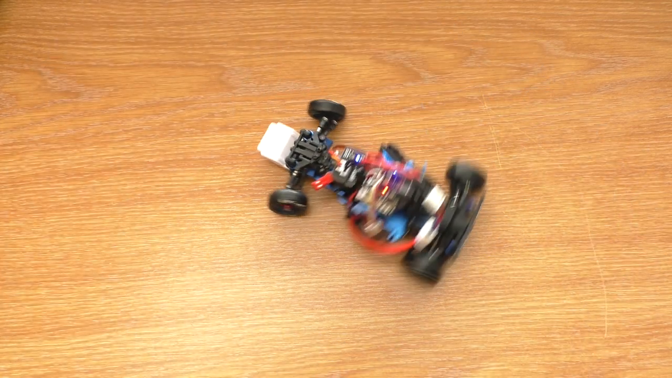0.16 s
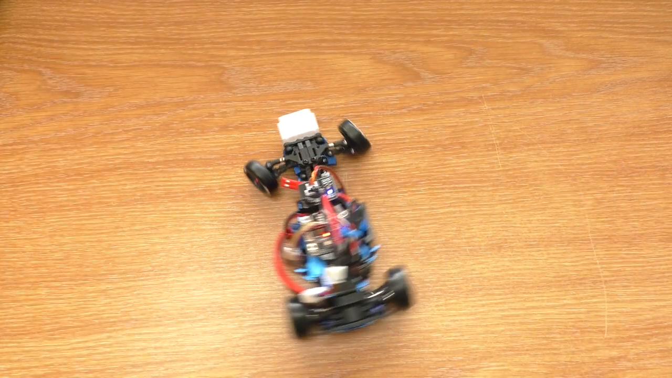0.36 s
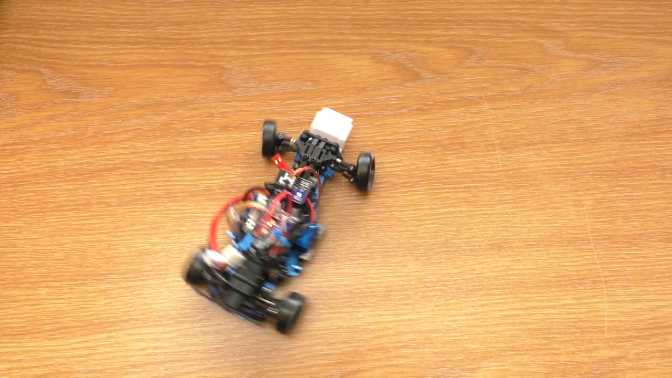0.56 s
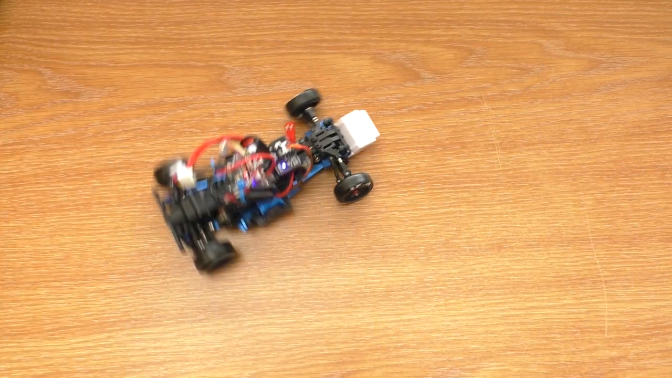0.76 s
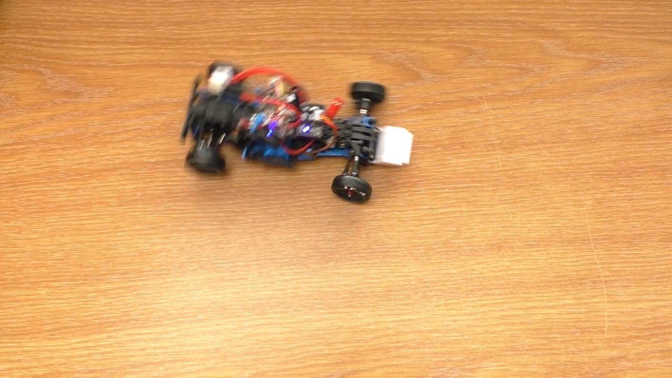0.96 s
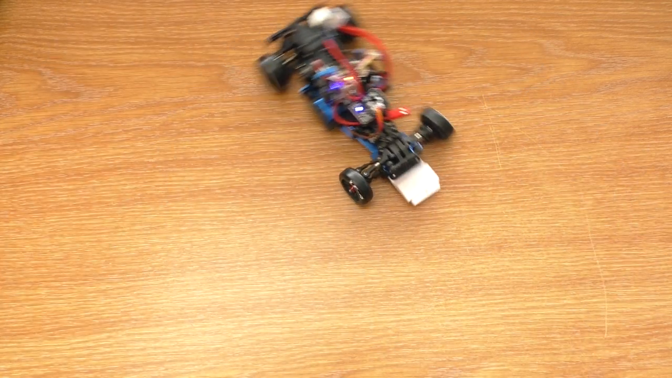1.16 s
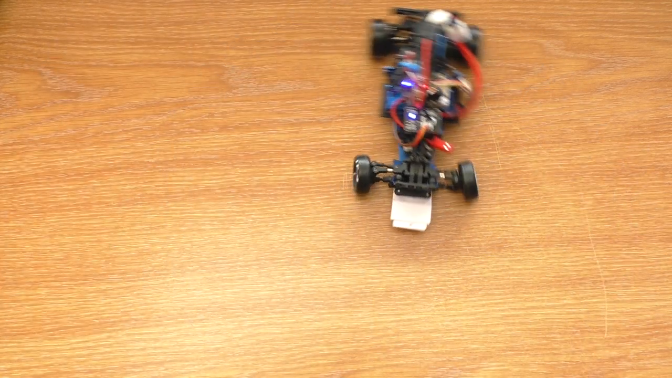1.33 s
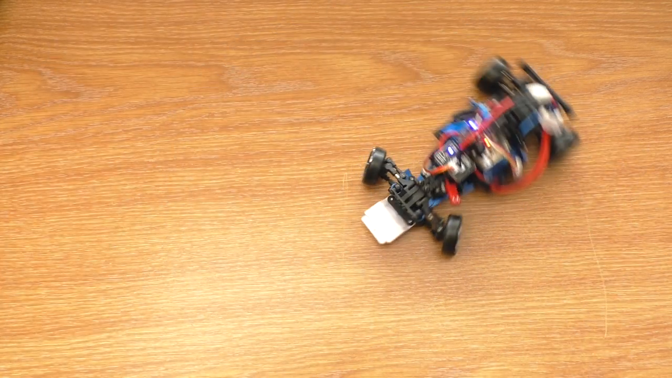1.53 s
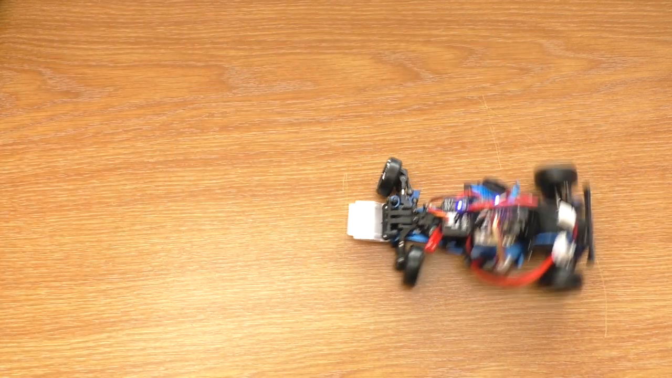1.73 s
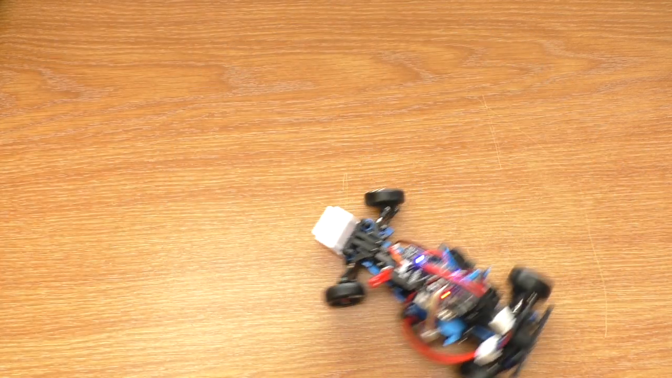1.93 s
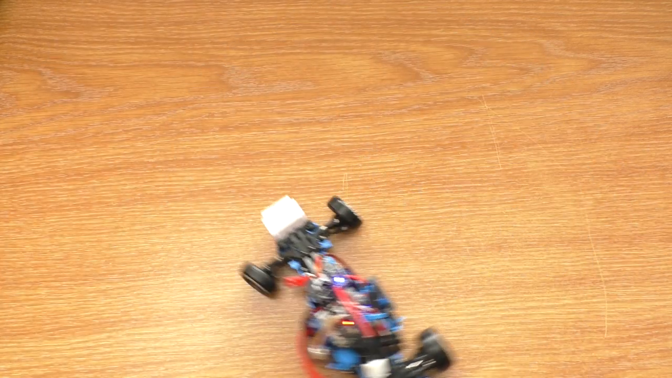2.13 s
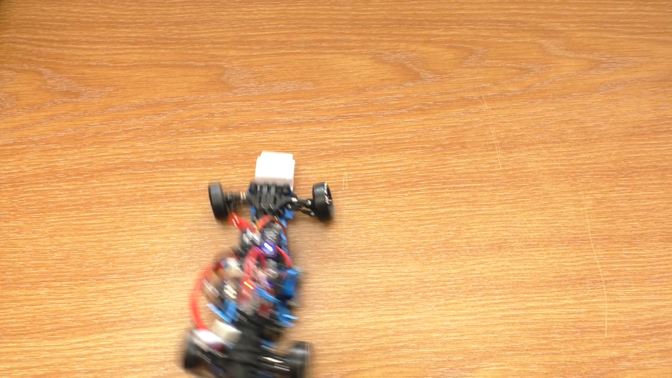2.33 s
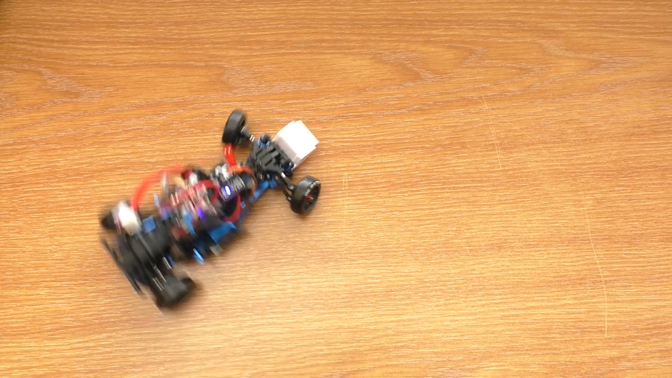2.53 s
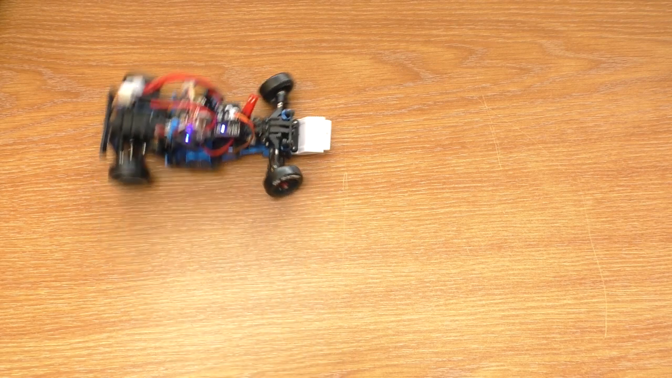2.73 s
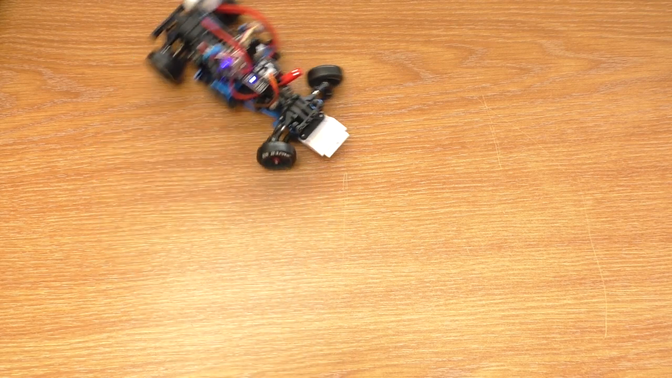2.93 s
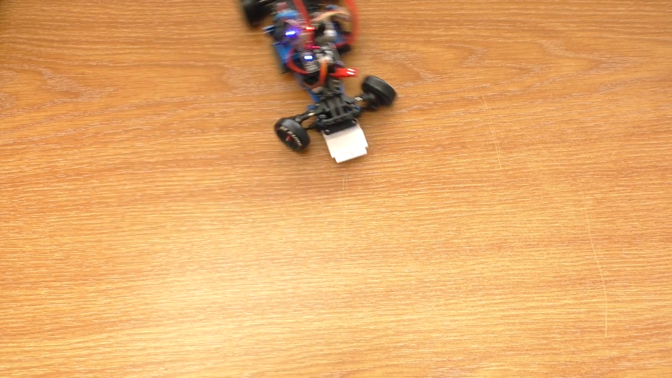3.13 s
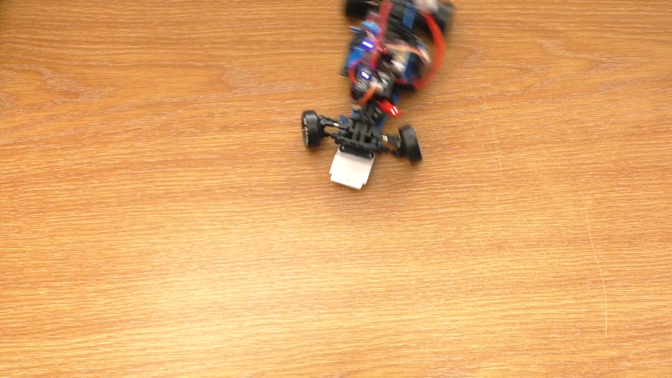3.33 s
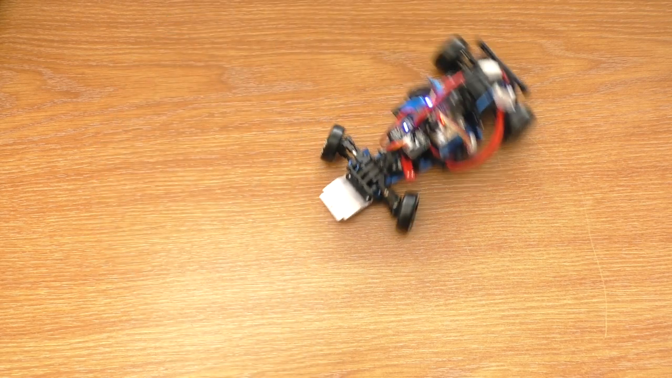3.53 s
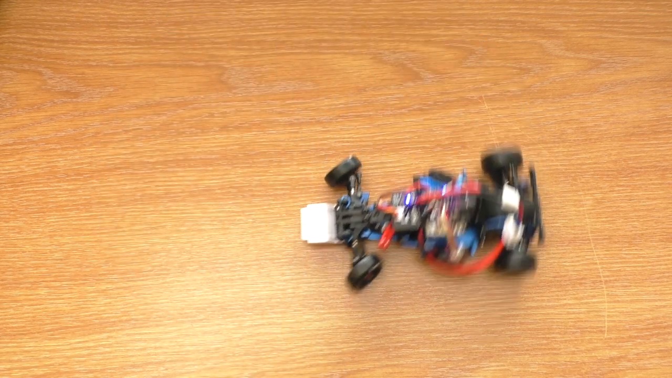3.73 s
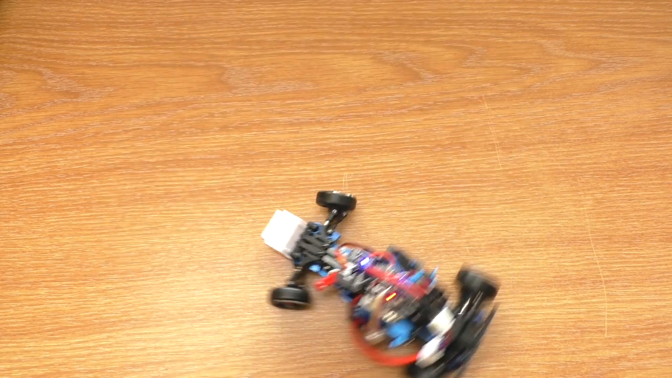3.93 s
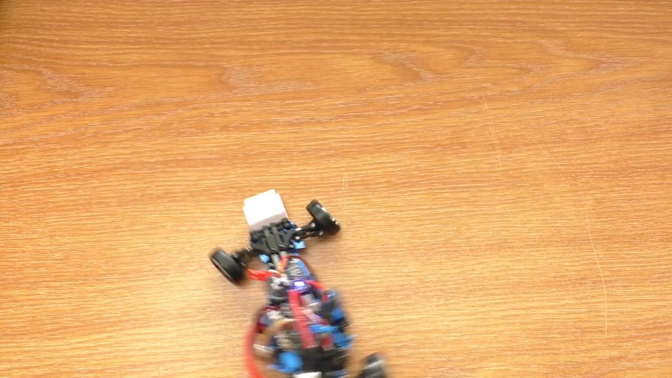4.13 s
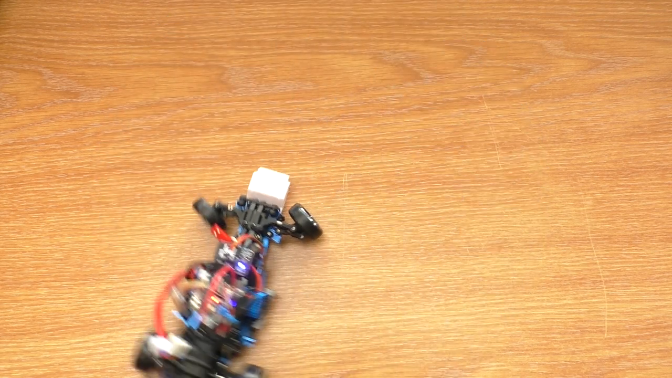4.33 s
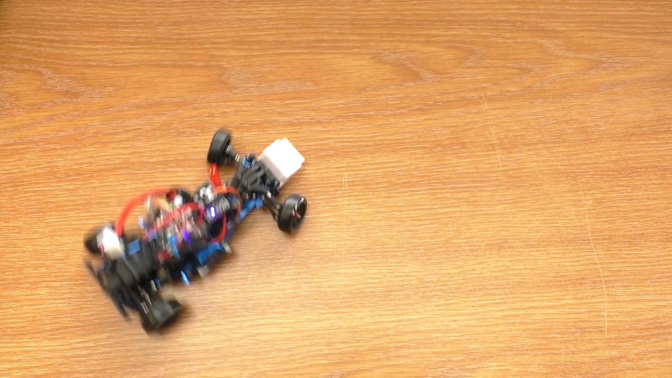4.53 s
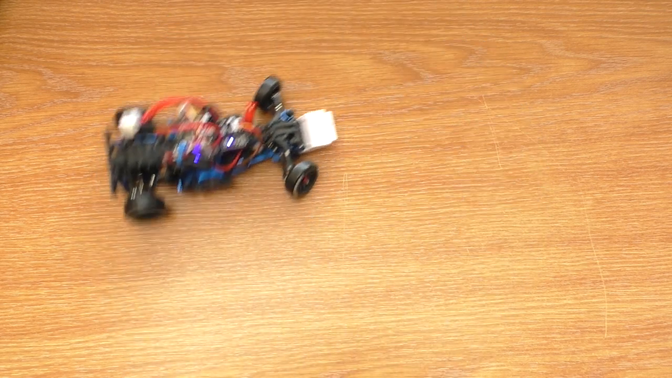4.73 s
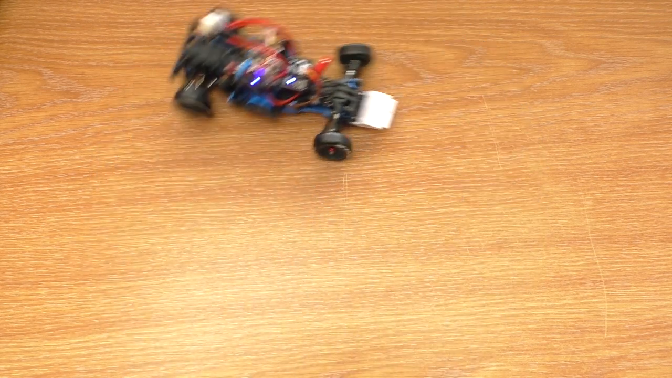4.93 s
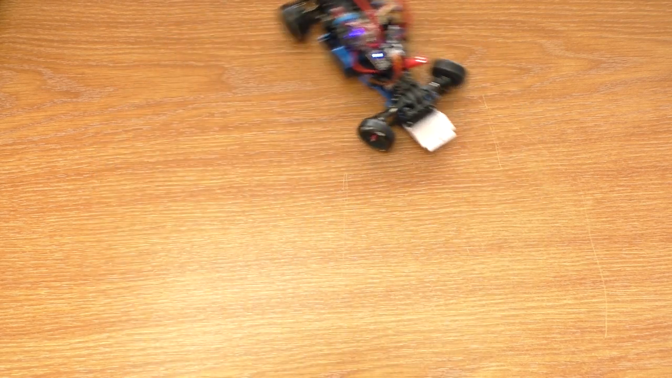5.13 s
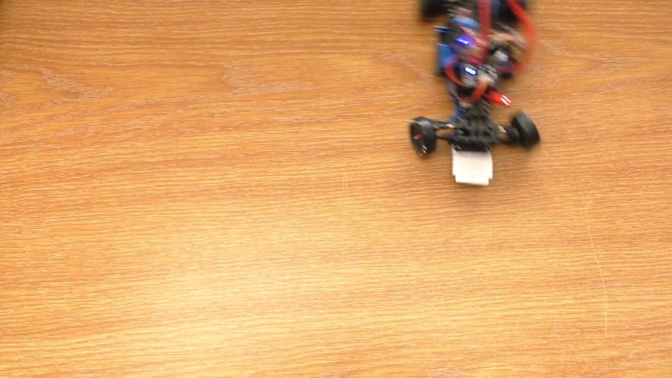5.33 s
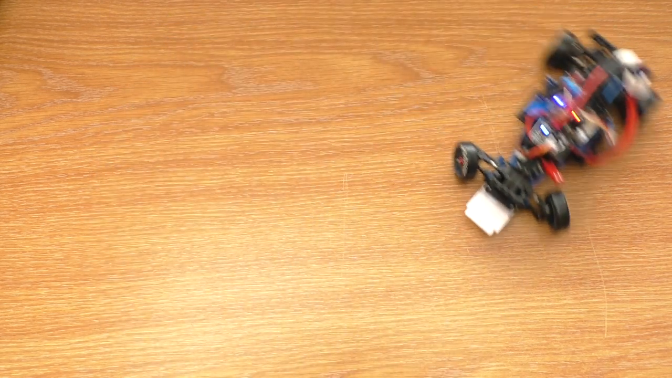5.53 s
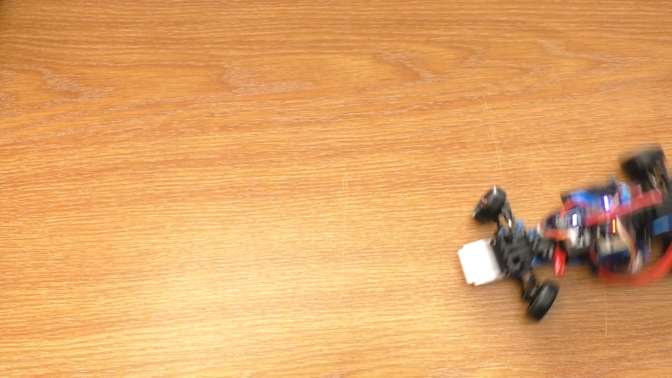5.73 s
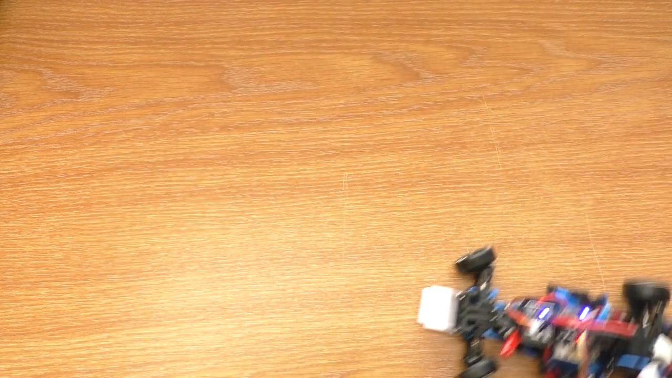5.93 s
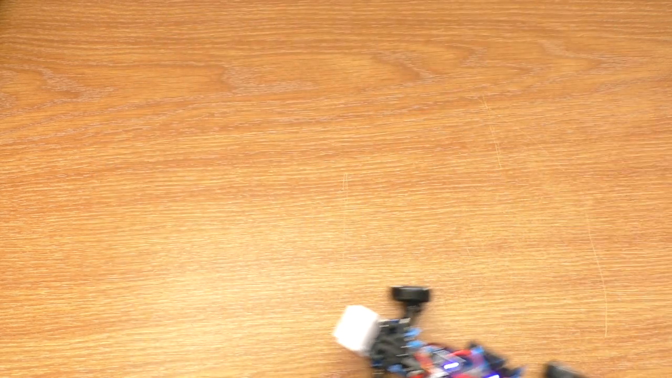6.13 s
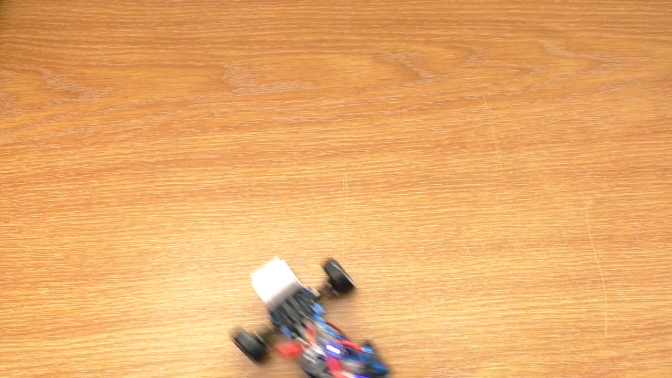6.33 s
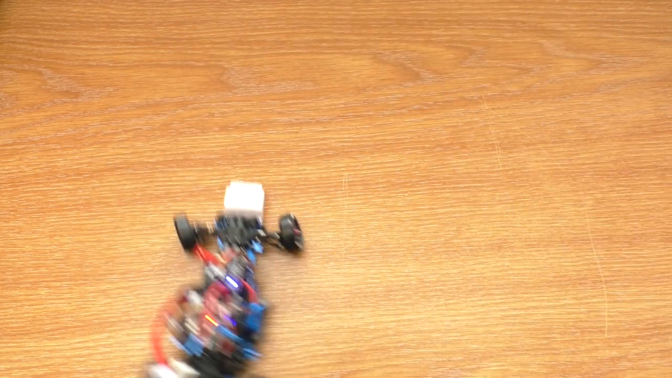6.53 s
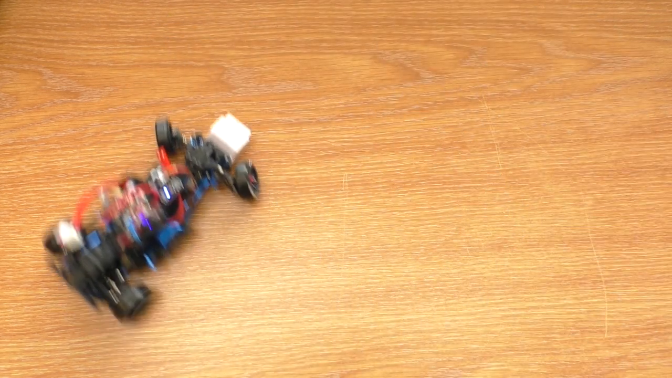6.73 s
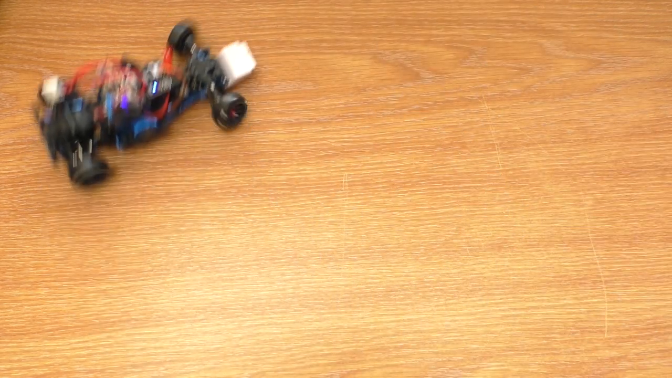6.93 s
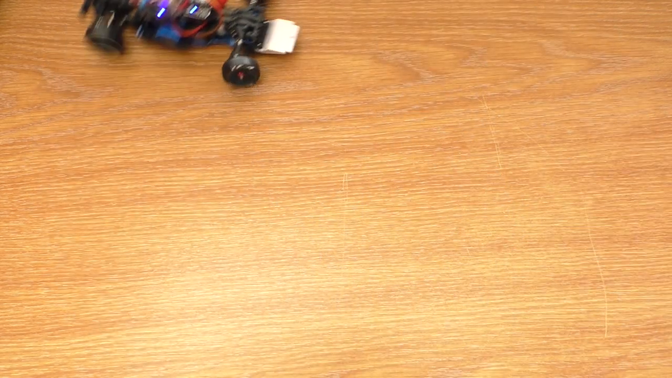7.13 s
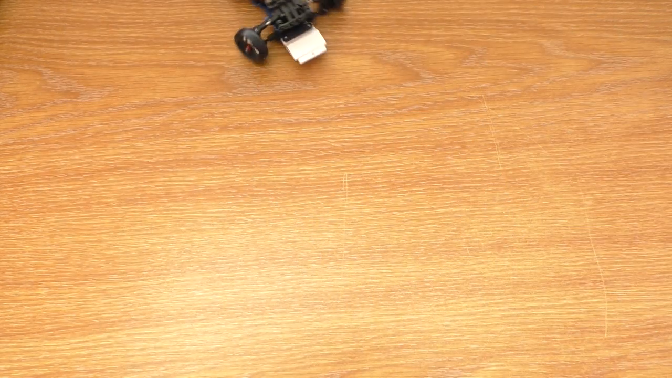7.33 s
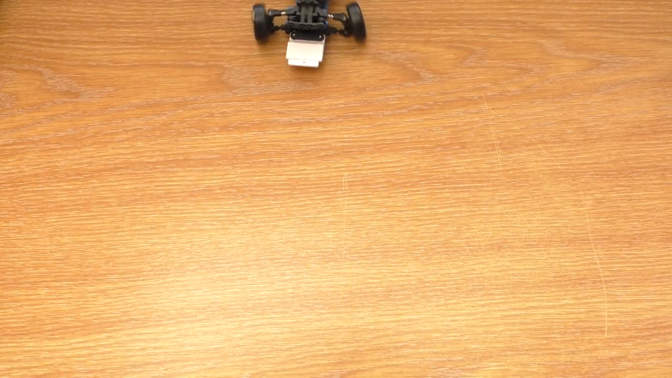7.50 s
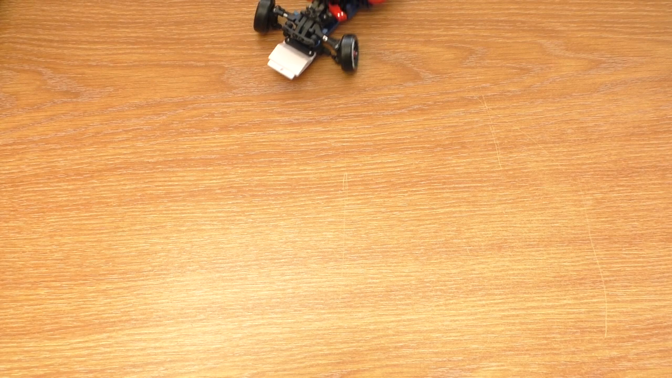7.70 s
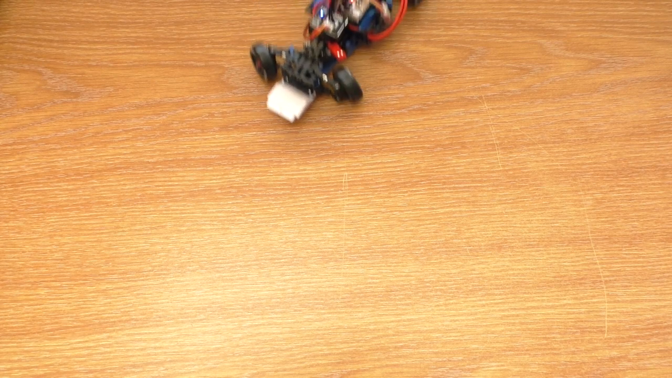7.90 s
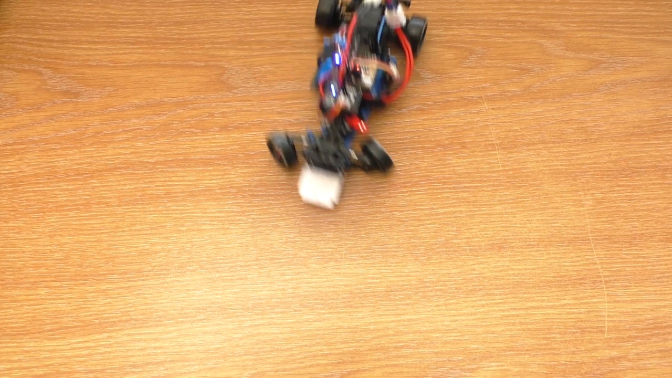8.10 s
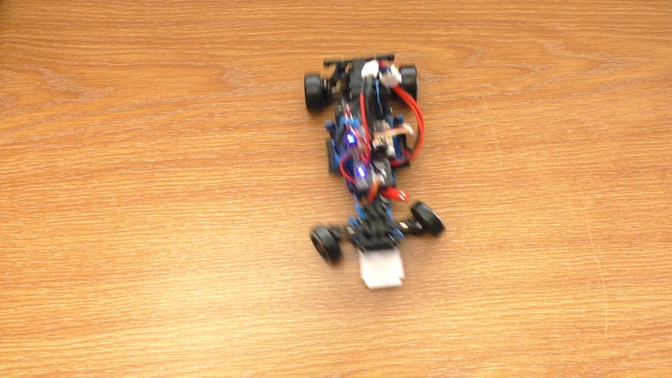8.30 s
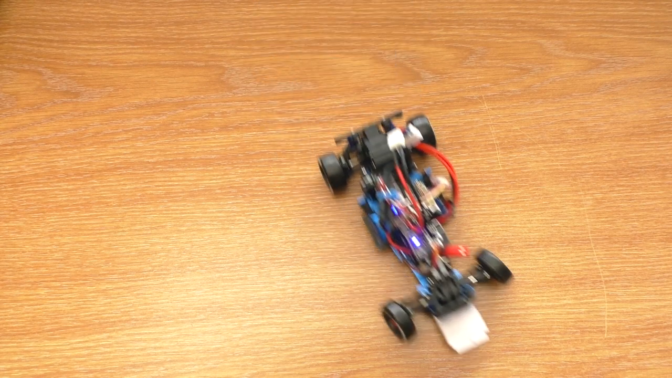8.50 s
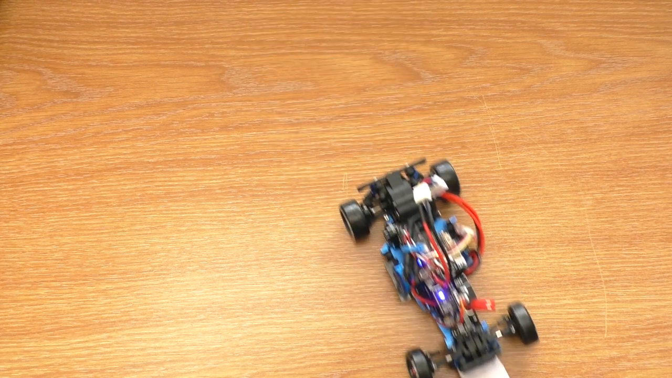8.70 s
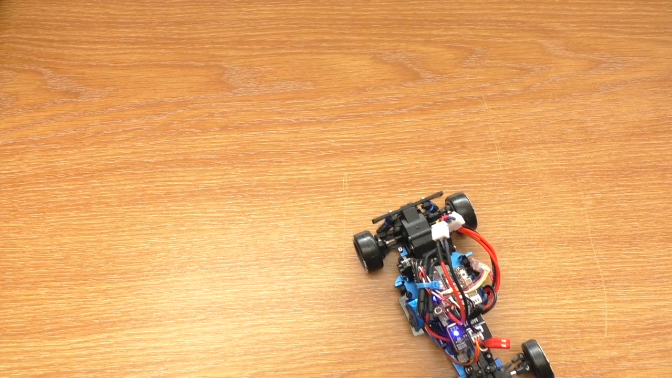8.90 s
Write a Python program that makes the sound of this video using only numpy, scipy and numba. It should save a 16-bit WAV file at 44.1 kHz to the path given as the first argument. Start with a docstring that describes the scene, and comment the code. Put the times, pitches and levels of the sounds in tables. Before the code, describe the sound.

A small remote-control electric car drifts in circles on a wooden desk, close by. Its drive line rattles rapidly under a high gear whine and hiss while hard tyres scrub the wood, the tone shifting with each lap. After about six seconds the run breaks into short bursts, then stutters to a stop with a few light ticks of loose parts. A faint low rumble lies underneath in a quiet room.

```python
"""A small electric car drifts in circles on a wooden desk, then stutters to a stop.
Once per axle turn the drive line rattles, ringing the chassis and the desk top. The gears whine and
hiss, biting harder with each rattle, and the hard tyres slide. The sound shifts in colour round the
lap, then breaks into short swells. Loose parts tick now and then, over a low rumble and a quiet room."""
import sys
import numpy as np
from scipy import signal
from scipy.io import wavfile
from scipy.ndimage import uniform_filter1d
from numba import njit

SR = 44100
rng = np.random.default_rng(int(sys.argv[2]) if len(sys.argv) > 2 else 0)


def bounce(signal):
    """Save signal as a 16-bit WAV file at the path given by the first command-line argument."""
    frames = np.transpose(np.atleast_2d(signal))
    limited = np.clip(frames, -1, 1)
    pcm = np.round(limited * 32767).astype(np.int16)
    wavfile.write(sys.argv[1], SR, pcm)


N = 399546
LAP_S = 2.0  # one colour cycle on the lap clock


def undb(db):
    """Decibels to gain."""
    return 10 ** (np.asarray(db) / 20)

def unit(x):
    """Scales to an RMS of 1."""
    return x / np.sqrt(np.mean(x ** 2))

def curve(t, points):
    """Straight lines through (time, value) points."""
    return np.interp(t, *np.transpose(points))

def lag(x, seconds):
    """One-pole smoothing."""
    pole = np.exp(-1 / (seconds * SR))
    return signal.lfilter([1 - pole], [1, -pole], x)

def walk(rate_hz):
    """Slow drift: random steps, smoothed twice."""
    hold = int(SR / rate_hz)
    steps = np.repeat(rng.standard_normal(N // hold + 1), hold)
    return uniform_filter1d(uniform_filter1d(steps, hold), hold)[:N]

@njit
def ring(x, tuning, damping):
    """State-variable resonator with a gain of 1 at its centre."""
    y, band, low = np.empty(len(x)), 0., 0.
    for i in range(len(x)):
        g, k = tuning[i], damping[i]
        v = (band + g * (x[i] + 1e-18 - low)) / (1 + g * (g + k))
        band, low, y[i] = 2 * v - band, low + 2 * g * v, k * v
    return y

def bandpass(x, hz, width_hz):
    """Band-pass at a steady or gliding centre."""
    return ring(x, np.tan(np.pi * hz / SR) * np.ones(N), width_hz / hz * np.ones(N))

def steep(x, hz, width_hz):
    """The band-pass twice, for dark valleys beside it."""
    return bandpass(bandpass(x, hz, 1.67 * width_hz), hz, 1.67 * width_hz)

def cut(x, hz, kind):
    """Steep high-pass or low-pass."""
    return signal.sosfilt(signal.butter(8, hz, kind, fs=SR, output="sos"), x)

def bands(table, flicker_db):
    """Noise bands (pitch_hz, width_hz, level_db) that flicker apart, mixed to an RMS of 1."""
    return unit(sum(undb(db + flicker_db * walk(9)) * steep(rng.standard_normal(N), hz, width)
                    for hz, width, db in table))

def swing(clock, once_db, once_s, twice_db=0, twice_s=0):
    """Level sway in dB, once and twice a lap; once_s and twice_s place each on the lap clock."""
    lap = 2 * np.pi / LAP_S
    return once_db * np.cos(lap * (clock - once_s)) + twice_db * np.cos(2 * lap * (clock - twice_s))

def body(modes, drive, clock, flicker_db):
    """Modes that come and go as the car circles over their nodes and turns its back."""
    return sum((-1) ** k * undb(db + swing(clock, *sway) + flicker_db * walk(3.99))
               * steep(drive, hz, width) for k, (hz, width, db, *sway) in enumerate(modes))

def room_tone():
    """A quiet room: faint, wavering bands of noise."""
    # pitch_hz, width_hz, level_db
    air = [(156, 52, -13.5), (473, 110, -3.5), (900, 370, -30.5), (2800, 1200, -30)]
    return undb(-68) * bands(air, flicker_db=11.5)

def low_rumble(t):
    """An uneven rumble that swells as the car starts to stutter."""
    # rumble contour: time_s, level_db
    contour = [(0, -64), (.7, -65.5), (.9, -77), (1.75, -72), (2.0, -68.5), (2.45, -66), (3.45, -77.5),
               (4.0, -70), (4.2, -60), (4.5, -63), (4.8, -80), (5.8, -65), (6.05, -46.5), (6.3, -46.5),
               (6.55, -55), (6.85, -58.5), (7.1, -76), (8.2, -74), (8.33, -65.5), (8.7, -68), (9.06, -72)]
    # bass resonances: pitch_hz, width_hz, level_db
    bass = [(27, 14, 3), (48.3, 9.9, 0.5), (103, 60, -5.5), (153, 25, -3), (203, 22, -10.5)]
    return undb(curve(t, contour) + 6 * walk(14)) * bands(bass, flicker_db=2.5)

def loose_ticks():
    """Loose parts tick, and near 1.2 s the axle knocks sharply on its slow turns: a quickly damped ring, a
    crack and a faint chassis tail each."""
    # ticks, levels relative: start_s, level_db, pitch_hz, crack_db; the first three rows are the axle's sharp
    # knocks on its slow turns
    ticks = [(1.175, -26, 5500, -19), (1.21, -31, 5500, -17), (1.251, -36, 5400, -19),
             (7.689, -37, 4850, -35), (8.117, -39, 5330, -22), (8.2626, -30, 4900, -21),
             (8.502, -35, 1880, -9), (8.54, -27.5, 1880, -7.5), (8.5537, -31, 1900, -7),
             (8.567, -31, 1880, -9), (8.578, -34, 2650, -3), (8.64, -21.5, 4930, -16),
             (8.652, -23, 4800, -10), (8.6647, -26, 4600, -7), (8.678, -24.5, 4720, -9),
             (8.698, -30, 2720, -6), (8.7174, -38, 2860, -5), (8.854, -52, 1840, -45),
             (8.99, -64.5, 8200, -45), (9.041, -45.5, 2880, -30)]
    out, age = np.zeros(N + 4000), np.arange(4000) / SR
    rise = 1 - np.exp(-age / 0.00083)
    for start_s, db, hz, crack_db in ticks:
        noise = rng.standard_normal((3, len(age)))
        roughness = 1 + 4 * lag(lag(noise[0], .0004), .0004)
        tone = np.sin(2 * np.pi * hz * age) * roughness * np.exp(-age / 0.004)
        crack = undb(16) * noise[1] * (np.exp(-age / 0.0016) + 0.23 * np.exp(-age / 0.011))
        tail = np.sin(2 * np.pi * 2720 * age) * 12 * lag(lag(noise[2], .001), .001) * np.exp(-age / 0.02)
        tick = rise * (tone + undb(crack_db) * (crack + tail))
        out[int(start_s * SR):][:len(age)] += undb(db - 3.5) * tick
    return bandpass(out[:N], 3100, 9700)

def axle_turns():
    """Times of the whole axle turns and how slow each is, 0 at cruise to 1."""
    # axle travel: time_s, turns_done
    axle = [(-0.011, 0), (0.12, 4), (0.363, 11), (0.868, 27), (1.141, 37), (1.171, 38), (1.247, 40),
            (1.359, 42), (1.849, 57), (2.248, 71), (2.659, 84), (3.008, 96), (3.226, 104), (3.384, 109),
            (3.496, 113), (3.715, 120), (4.23, 135), (4.681, 150), (4.92, 159), (5.215, 168), (5.498, 176),
            (5.626, 179), (5.749, 183), (5.794, 184), (5.851, 185), (5.913, 186), (5.966, 187),
            (6.024, 188), (6.071, 189), (6.261, 192), (6.311, 193), (6.529, 201), (6.567, 202),
            (6.687, 204), (6.957, 214), (6.996, 215), (7.105, 217), (7.317, 224), (7.351, 225),
            (7.562, 226), (7.827, 227), (7.861, 228), (7.888, 229), (7.971, 232), (8.003, 233),
            (8.044, 234), (8.291, 235), (8.332, 236), (8.641, 237), (8.676, 238)]
    cruise_turn_s, slow_turn_s, look_ahead = 0.029, 0.08, 0.83
    times, turns = np.transpose(axle)
    turn_s = np.interp(np.arange(turns[-1] + 1), turns, times)
    gaps = np.minimum(np.diff(turn_s, prepend=turn_s[0] - cruise_turn_s, append=np.inf), slow_turn_s)
    length_s = look_ahead * gaps[1:] + (1 - look_ahead) * gaps[:-1]
    return turn_s, (length_s - cruise_turn_s) / (slow_turn_s - cruise_turn_s)

def swell_levels(t, clock, slowness):
    """Rattle, whine, slide and hiss swell, under throttle and while coasting; the loudest swell wins."""
    # swells: start_s, rise_s, hold_s, rattle_db, whine_db, slide_db, hiss_db
    swells = [(-.3, 0.016, 6.2, -28.5, -36, -35, -44), (5.846, 0.11, 0.19, -28, -37.5, -36, -45),
              (6.115, 0.028, 0.19, -31.5, -33, -33.5, -45.5), (6.235, 0.073, 0.27, -28, -37, -35, -42),
              (6.568, 0.093, 0.31, -28, -37.5, -33, -44), (7.065, 0.044, 0.26, -30.5, -35, -31.5, -43),
              (7.42, 0.02, 0.036, -60, -58, -42, -43.5), (7.454, 0.075, 0.062, -30.5, -38, -39, -45),
              (7.593, 0.017, 0.087, -60, -58, -48, -49.5), (7.735, 0.013, .08, -60, -36.5, -41.5, -39),
              (7.752, 0.08, 0.22, -28.5, -29, -32.5, -41), (8.1, 0.016, 0.011, -60, -55, -38.5, -45.5),
              (8.171, 0.014, 0.063, -60, -60, -47.5, -57), (8.284, 0.011, 0.056, -23, -31, -31.5, -37.5),
              (8.384, 0.017, .06, -62, -52, -47.5, -46.5), (8.479, 0.025, 0.014, -61.5, -44, -51, -43),
              (8.546, .01, 0.033, -60, -50, -51, -52), (8.633, 0.013, 0.027, -31.5, -40, -37, -46)]
    # sway round the lap, a row per layer: once_db, once_s, twice_db, twice_s
    circling = [(.3, 0.18, 0, 0.027), (1, 1.65, 1.5, 0.25), (1, 0.75, 0.5, 0.067), (1, 0.15, -0.5, 0.35)]
    # softening at the slowest turn: rattle_db, whine_db, slide_db, hiss_db
    slowing_db = (-7.5, -3.5, -3.5, -6)
    # release after a swell, one per layer: fade_db_per_s
    fade_db_per_s = (97, 450, 170, 450)
    rise_db, kick_db, kick_s = 14.5, 1.5, 0.068
    levels = []
    for layer, sway in enumerate(circling):
        loudest = -np.inf
        for start_s, rise_s, hold_s, *db in swells:
            since = t - start_s - rise_s
            rise = rise_db * np.minimum(since / rise_s, 0)
            kick = kick_db * np.exp(-np.maximum(since, 0) / kick_s)
            fade = fade_db_per_s[layer] * np.maximum(since - hold_s, 0)
            loudest = np.maximum(loudest, db[layer] + rise + kick - fade)
        levels.append(loudest + slowing_db[layer] * slowness + swing(clock, *sway))
    return levels

def car_position(car, t, clock):
    """The low end comes and goes, the treble dips as the car turns its back, distance rides the level."""
    # low-end boost or cut: time_s, gain_db
    low_end = [(0, 14), (.22, -15), (.5, 0.5), (1.1, 0.5), (1.3, -13.5), (2.2, 4), (3.5, -5), (3.9, -15),
               (4.15, 5), (5.5, -4.5), (6.22, -5), (6.35, 0), (7.3, 5.5), (7.45, -16), (7.9, 4.5),
               (8.2, -5.5), (8.35, 2.5), (8.8, -8)]
    # the car drifts nearer and further: time_s, gain_db
    nearness = [(0, 4.5), (.15, 1.5), (1.0, 1), (1.2, 0.5), (2.2, 1.5), (2.42, 0), (2.66, 2), (2.9, -0.5),
                (3.8, 0.5), (4.2, 1.5), (4.85, 1.5), (5.0, -0.5), (5.45, 1.5), (5.65, 2), (5.8, 1)]
    car = car + (undb(curve(t, low_end)) - 1) * bandpass(car, hz=300, width_hz=150)
    shade = np.clip(0.22 + 0.48 * np.cos(2 * np.pi * (clock - 1.7) / LAP_S), 0, .97)
    car = car - shade * bandpass(car, hz=6790, width_hz=590)
    return car * undb(curve(t, nearness))

def tyre_slide():
    """Hard tyres slide on wood: a midrange scrub with a thin, fitful squeak above it."""
    # scrub resonances: pitch_hz, width_hz, level_db
    resonances = [(294, 50, -25), (504, 156, -12.5), (805, 39, -2), (930, 71, -1.5), (1080, 157, -4.5),
                  (1244, 86, -5)]
    scrub = cut(bands(resonances, flicker_db=1.5), 1680, "low")
    squeak = bands([(2500, 230, 0)], flicker_db=12.5)
    return scrub + undb(-21) * squeak

def gear_hiss(clock):
    """The gears' treble hiss, changing colour round the lap."""
    # hiss bands: pitch_hz, width_hz, level_db, once_db, once_s
    treble = [(6650, 790, 2, 4.5, 1.07), (7920, 780, 7.5, 0.98, 2.1), (8600, 690, 7.5, 1.1, 1.1),
              (9980, 2200, 1, 0.94, 0.4), (11400, 1200, -5.5, 0.81, 0.62), (12120, 860, 2.5, 3, 1.2),
              (14670, 1800, -7, 1.5, .5)]
    return cut(unit(body(treble, rng.standard_normal(N), clock, flicker_db=4)), 5600, "high")

def gear_whine(t):
    """The gears whine in noisy bands that lean with a thin gliding line, over a broad whirr."""
    # the thin line: time_s, pitch_hz, level_db
    glides = [(0, 4700, -10), (.3, 5430, 0), (.7, 4500, -17.5), (1.1, 4800, -18), (1.4, 5260, 2.5),
              (2.0, 4800, 0), (2.45, 5040, -13), (2.75, 4230, 3), (3.1, 4900, 8), (3.219, 5120, -6),
              (3.46, 4820, 3), (3.9, 5200, -14), (4.5, 4940, -17), (4.8, 4900, 0), (5.3, 5500, -18),
              (5.7, 4900, -10), (5.85, 4420, 5), (5.93, 4600, 6), (6.02, 5060, 5), (6.1, 4670, 6),
              (6.17, 4500, -7), (6.29, 5100, 0), (6.35, 4900, 3), (6.43, 4950, 6), (6.8, 5000, -3),
              (7.1, 4370, -4), (7.5, 5280, 3), (7.7, 4830, -2), (7.92, 4870, -2), (8.06, 5360, -6),
              (8.15, 5900, 19), (8.25, 5600, 3), (8.31, 5140, 0), (8.5, 5520, 6), (8.7, 4800, -7)]
    # whine bands: pitch_hz, width_hz, level_db
    resonances = [(4460, 770, -3.5), (5250, 660, -1.5), (5770, 390, -0.5)]
    times, pitches, levels = np.transpose(glides)
    line_hz, line_db = np.interp(t, times, pitches), np.interp(t, times, levels)
    line = unit(steep(rng.standard_normal(N), line_hz, 200)) * undb(line_db - 3 + 1.5 * walk(8))
    centre_hz, follow = 5170, 0.32
    lean = (line_hz / centre_hz) ** follow
    whine = bands([(hz * lean, width, db) for hz, width, db in resonances], flicker_db=2)
    whirr = bands([(2300, 2200, 0)], flicker_db=3)
    return cut(whine + line, 3950, "high") + undb(-14) * whirr

def impacts(turns, samples=4096, likeness=0.6):
    """A row of grit and one solid knock per turn; the same worn parts meet, so the rows are alike."""
    shape = (turns, samples)
    fresh = rng.standard_normal(shape) * undb(3 * np.minimum(rng.exponential(size=shape), 4))
    grit = unit(signal.lfilter([1], [1, -likeness], fresh, axis=0))
    knock = np.exp(-((np.arange(samples) / SR - .005) / .00011) ** 2)
    return grit + undb(8 + 1.5 * rng.standard_normal((turns, 1))) * knock

def drive_line(t, turn_s, level_db):
    """The drive line's rattle flares at each whole turn and dies away: its strength and its impacts."""
    lead_s, jitter_s = .002, .0004
    timing, force = rng.standard_normal((len(turn_s), 2)).T
    start_s = turn_s - lead_s + jitter_s * timing
    size = undb(np.interp(turn_s, t, level_db) + 0.28 * force)
    turn = np.clip(np.searchsorted(start_s, t) - 1, 0, None)
    age = np.abs(t - start_s[turn])
    flare = size[turn] * (np.exp(-(age / 0.0081) ** 2) + 0.5 * np.exp(-(age / 0.059) ** 2))
    strength = lag(flare, 0.003) * undb(0.84 * walk(250))
    rows = impacts(len(turn_s))
    return strength, strength * rows[turn, (age * SR).astype(int) % rows.shape[1]]

def desk_knock(t, hits, clock):
    """The impacts ring the desk top, with brief hollow swells of single resonances."""
    # desk modes: pitch_hz, width_hz, level_db, once_db, once_s, twice_db, twice_s
    modes = [(303, 29.3, -4.5, 4.5, 1.1, 2, 0.48), (332, 8.1, -7.5, 2.5, 1.7, -3.5, 0.46),
             (398, 26.3, -4.5, 5.5, 1.31, 2.5, 0.79), (484.6, 21.7, -2, 4.5, 1.77, 0.5, 0.14),
             (580.6, 56.5, -1, 3, 1.32, 1.5, 0.72), (654.4, 42, -0.5, 2.5, 0.72, 0, 1),
             (731, 24.3, -1, 5.5, 1.21, 2.5, 0.036), (802.5, 25.6, -4, 9.5, 1.23, -2, 0.2),
             (886.7, 45, 1, 5, 1.03, 4.5, 0.47), (955, 15.7, -2.5, 1, 0.46, 7.5, 0.77),
             (1039, 59, -3, 2.5, 1.46, -1, 0.34), (1114, 76, -1, 1, 2.05, 4.5, 0.1),
             (1240.5, 28, 2, -0.5, 0.25, 4.5, 0.6), (1364, 44, 0, 3, 0.53, 0, 0.54),
             (1472, 27, 4.5, 0.5, 0.25, 0.5, 0.97), (1558, 80, 1.5, 0.5, 0.12, -0.5, 1)]
    # hollow swells: peak_s, half_length_s, pitch_hz, level_db
    hollows = [(0.87, 0.11, 640, 5.5), (1.05, 0.12, 717, -2), (2.5, 0.14, 920, 3.5), (2.752, 0.13, 627, 4),
               (2.78, 0.091, 920, -7), (3.1, 0.083, 816, 3), (4.55, .15, 1250, -5), (4.8, 0.2, 710, -1),
               (6.0, 0.14, 713, 10.5), (6.38, 0.15, 612, 4)]
    desk = body(modes, hits, clock, flicker_db=1.5)
    return desk + sum(undb(db) * np.exp(-((t - peak_s) / half_s) ** 2) * bandpass(desk, hz, width_hz=74)
                      for peak_s, half_s, hz, db in hollows)

def chassis_rattle(hits, clock):
    """The impacts ring the car's small, bright chassis."""
    # chassis modes: pitch_hz, width_hz, level_db, once_db, once_s
    modes = [(1727, 320, -9, 1.5, 0.11), (2072, 124, -4.5, 0.96, 1), (2334, 101, -2, 1.9, 0.13),
             (2565, 136, -6, 0.5, 0.18), (2783, 83, -2, 1.6, 0.3), (2937, 110, -5.5, 2.2, 1.33),
             (3153, 165, -3, 0.99, 0.31), (3497, 148, -3, 1.7, 0.36), (3837, 247, -6, 0.43, 0.28),
             (4400, 600, -9, 0.97, 0.62), (5020, 690, -7.5, 1, 1.2), (5900, 1110, -13.5, 0.37, 0.55),
             (8530, 1430, -29, 9.7, 1.62), (9970, 700, -16.5, 2.8, 2.28), (12700, 3700, -24.5, 1.3, 1)]
    return body(modes, hits, clock, flicker_db=1.5)

def scene():
    """The circling car with its ticks, over rumble and room; mono."""
    # the colour cycles once a lap, then sweeps quickly back and forth in the stutter: time_s, lap_time_s
    colour_cycle = [(0, 0), (6, 6), (6.85, 10.5), (7.25, 8.5), (7.9, 11), (8.3, 7), (9.1, 8)]
    t = np.arange(N) / SR
    clock = curve(t, colour_cycle)
    turn_s, slowness = axle_turns()
    rattle_db, whine_db, slide_db, hiss_db = swell_levels(t, clock, np.interp(t, turn_s, slowness))
    strength, hits = drive_line(t, turn_s, rattle_db)
    rattle = undb(12.5) * chassis_rattle(hits, clock) + undb(9.5) * desk_knock(t, hits, clock)
    bite = 1 + 4.2 * strength  # the teeth bite harder while the drive line rattles
    whine = undb(whine_db - 4.5) * bite * gear_whine(t)
    slide = undb(slide_db - 3.5) * tyre_slide()
    hiss = undb(hiss_db) * bite * gear_hiss(clock)
    car = car_position(rattle + whine + slide + hiss, t, clock)
    return (car + low_rumble(t) + room_tone() + loose_ticks())[None]

def record(dry):
    """A steep low-pass takes off the very top."""
    top_hz = 15760
    return signal.sosfilt(signal.ellip(12, .3, 60, top_hz, fs=SR, output="sos"), dry)


dry = scene()
out = record(dry)
bounce(out)
```